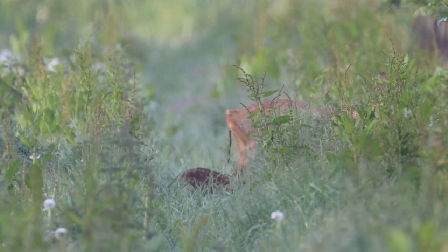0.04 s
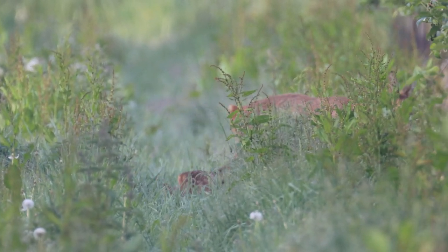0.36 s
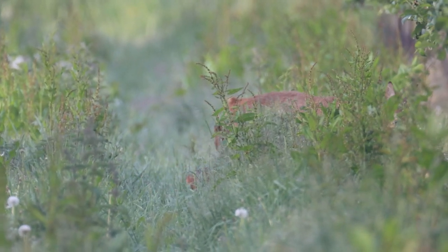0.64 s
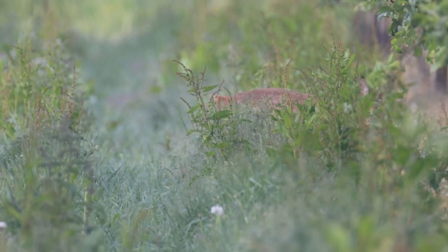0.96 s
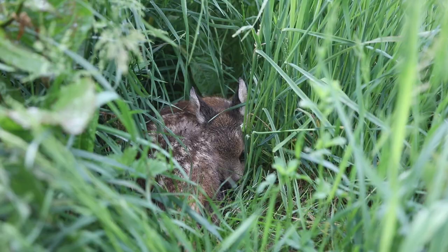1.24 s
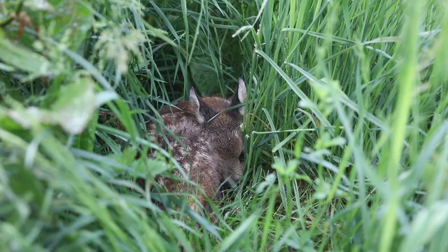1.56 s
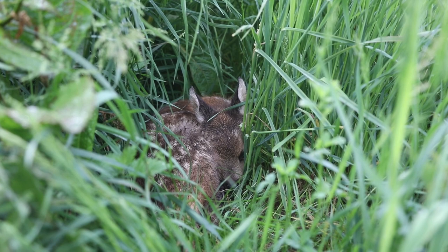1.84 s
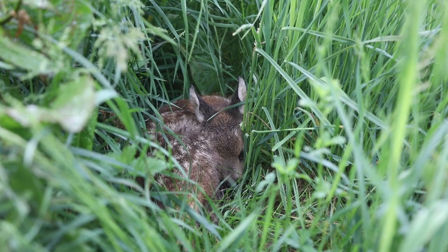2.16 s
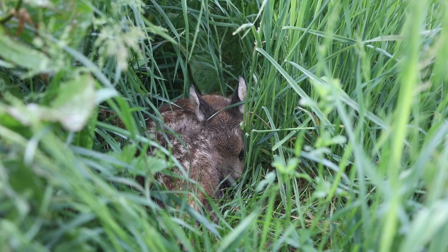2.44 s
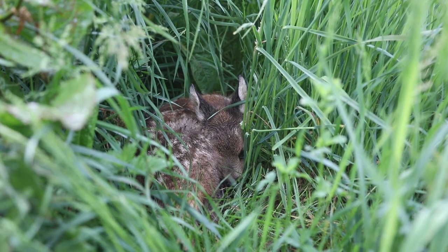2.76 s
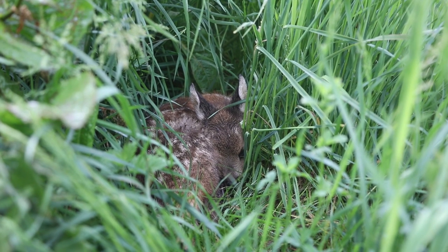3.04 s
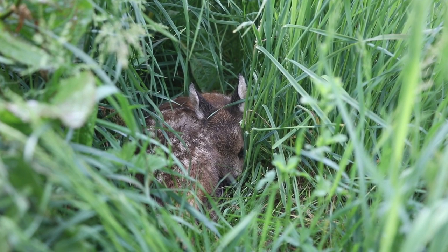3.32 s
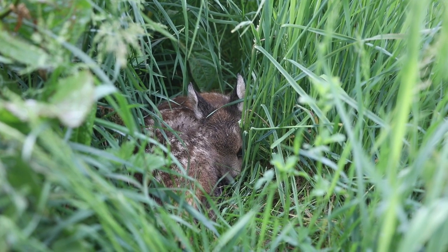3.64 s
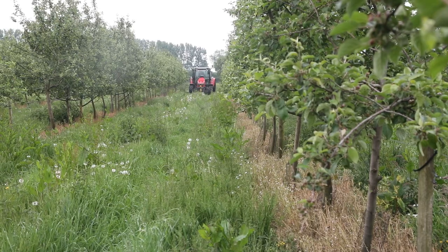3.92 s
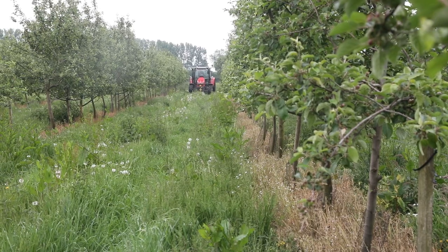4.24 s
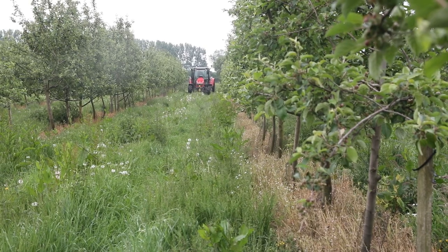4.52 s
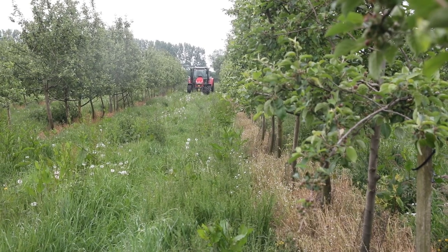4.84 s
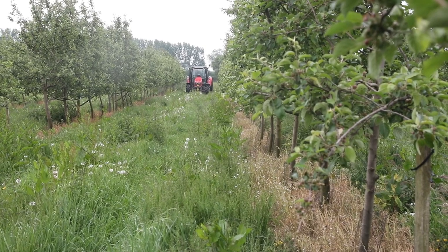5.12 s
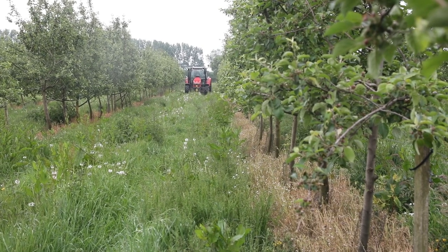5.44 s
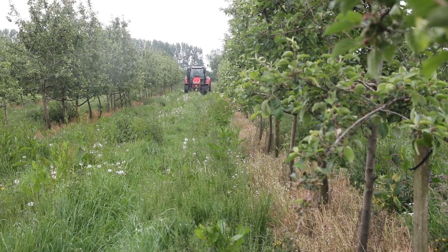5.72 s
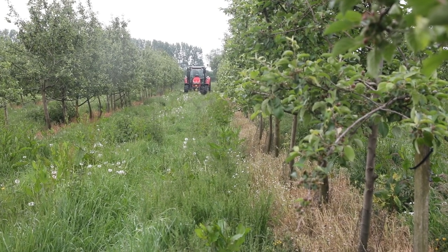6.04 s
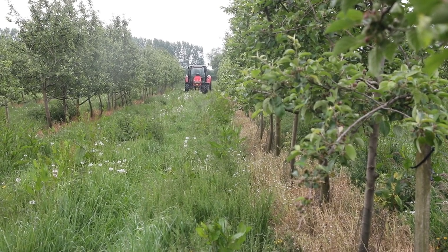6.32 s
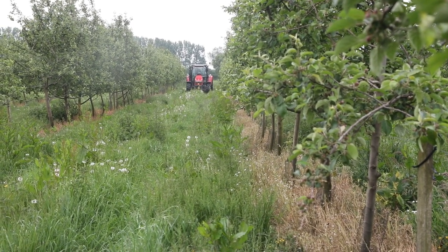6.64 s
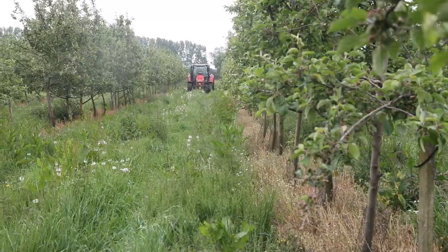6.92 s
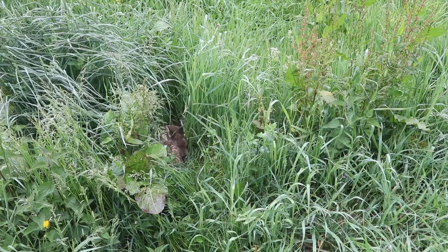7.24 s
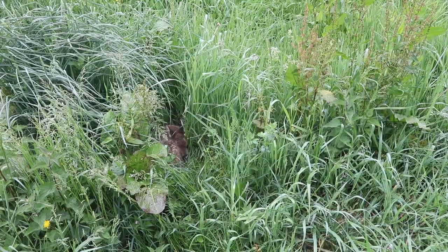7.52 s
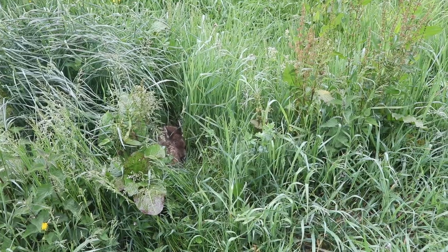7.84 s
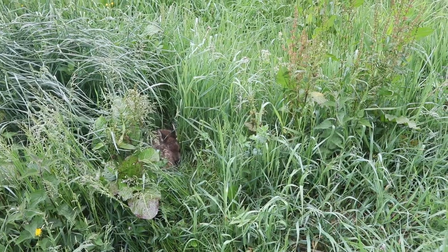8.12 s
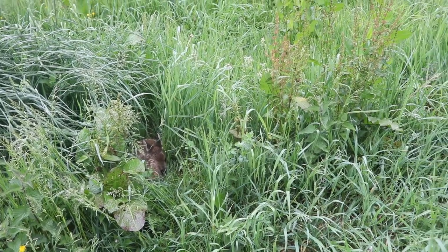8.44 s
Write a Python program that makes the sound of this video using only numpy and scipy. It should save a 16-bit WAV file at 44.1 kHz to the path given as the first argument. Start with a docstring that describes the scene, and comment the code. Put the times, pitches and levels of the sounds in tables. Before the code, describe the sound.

After a brief meadow hush, a diesel tractor drones far off, then closer and louder, with faint ticks and small bird chirps.

```python
"""Four spots in an orchard, joined by hard cuts. First a quiet meadow: still air, a camera's dry ticks,
a deer brushing through weeds. From 1.3 s a three-cylinder diesel tractor drones far off at steady revs:
firings ring the silencer, injectors and valves clatter. The camera adds hum, a thin whine and two motor
whistles; small birds chirp. From 3.9 s the tractor creeps closer down a lane, its gears singing.
At 7.3 s, after a soft bump, it is heard from the grass verge with heavier beats."""
import sys
import numpy as np
from scipy import signal
from scipy.fft import rfft, irfft
from scipy.io import wavfile
from scipy.ndimage import uniform_filter1d

SR = 44100
rng = np.random.default_rng(int(sys.argv[2]) if len(sys.argv) > 2 else 0)


def transcribe(u):
    """Save the signal u as a 16-bit wav file named by the first command-line argument.

    u: samples, shape (n,) or (channels, n), limited to [-1, 1]; the rate is SR.
    q: integer samples, one column per channel.
    """
    v = np.clip(np.atleast_2d(u).T, -1, 1)
    q = np.round(v * 32767).astype(np.int16)
    wavfile.write(sys.argv[1], SR, q)


N = 382347
TIME_S = np.arange(N) / SR
MEADOW, FAR, LANE, VERGE = range(4)

# Each entry: start of a spot in seconds; the last ends the verge.
SPOT_EDGES_S = [0, 1.322, 3.879, 7.283, 8.7]
# Each entry: time of a camera tick in seconds.
TICK_TIMES_S = [.267, .309, .724, .806, .871, .901, 1.145, 1.161, 1.297, 1.346, 1.369, 1.46, 1.506, 1.76,
                2.005, 2.03, 2.068, 2.081, 2.111, 2.144, 2.451, 2.575, 2.588, 2.874, 3.008, 3.099, 3.137,
                3.18, 3.255, 3.303, 3.312, 3.405, 3.472, 3.6, 3.633]

# Spectra of air, ticks and weeds. Each row: frequency in Hz, relative level in dB.
AIR_HZ_DB = [(18, -48), (30, -12), (107, -9.5), (139, -3.5), (167, -7.5), (260, -6.5), (288, -8.5),
             (581, -13.5), (1200, -18.5), (1560, -13.5), (1920, -19.5), (3590, -22), (5030, -26.5),
             (7240, -31), (15000, -35)]
TICK_MEADOW_HZ_DB = [(800, -14), (2000, -1.5), (4200, -0.5), (6000, -5), (8600, -9), (9500, -13),
                     (15000, -20)]
TICK_LATER_HZ_DB = [(1000, -12), (2800, -8.5), (3420, 4.5), (3950, 0.5), (4600, -19), (7500, -23),
                    (8800, -22), (9800, -11), (10300, -19), (10900, -15), (12500, -26)]
STEMS_HZ_DB = [(1250, -22), (1600, 0), (1950, 1), (2500, -4), (3500, -7), (4200, 0), (4700, -17)]
LEAVES_HZ_DB = [(2000, -7), (3050, 3), (4000, -5), (5100, -7), (5600, -11), (6300, -12), (7000, -16)]
ROUGHNESS_HZ_DB = [(10, -6), (150, 4), (400, -14)]

# Engine speed. Each row: time in seconds, firing rate in Hz.
FIRING_S_HZ = [(1.32, 41.5), (3.85, 41.9), (3.9, 42.75), (5.1, 42.4), (7.35, 42.35), (8.65, 42.65)]
# Cylinders. Each row: relative level in dB, lateness as a share of one firing.
CYLINDER_DB_LAG = [(3, -0.0052), (-1, 0.018), (4, -0.013)]
# Spectra of exhaust beat, gas rasp, far drone and ring. Each row: frequency in Hz, relative level in dB.
EXHAUST_HZ_DB = [(25, -39), (42, -27.5), (60, -11.5), (85, -3.5), (127, -0.8), (168, 1), (212, -12),
                 (255, -20), (340, -36.5), (600, -47.5)]
FAR_GAS_HZ_DB = [(480, -10), (620, -2), (740, -10.5)]
LANE_GAS_HZ_DB = [(330, -22), (420, 4), (560, -0.5), (620, -6.5), (720, -20)]
BLUR_HZ_DB = [(75, -12.5), (95, -12.5), (125, -4.5), (165, 1), (205, -1.5), (260, -12.5)]
RUMBLE_HZ_DB = [(30, -14), (42, 4), (60, -25), (85, 3), (110, -8)]
RING_HZ_DB = [(1150, -18.5), (1260, 3), (1340, 1), (1440, -23.5)]
# Clatter coloured by ground and trees, and hiss above it. Each row: frequency in Hz, relative level in dB.
FAR_CLATTER_HZ_DB = [(200, -0.5), (300, 4.5), (480, -5.5), (730, -9.5), (1000, -5), (1300, -3),
                     (1480, -9.5), (2000, -11.5), (3150, -15.5), (3300, -11), (3420, -8), (3600, -15),
                     (4700, -30), (7000, -37.5)]
LANE_CLATTER_HZ_DB = [(200, 0.5), (340, -12), (570, -6.5), (710, -10.5), (900, -7), (1120, 2), (1400, -1.5),
                      (1750, -5.5), (2000, -7), (3150, -11), (3420, -9.5), (3800, -17), (4800, -17.5),
                      (5600, -39)]
VERGE_CLATTER_HZ_DB = [(180, 2), (270, 3.5), (400, -6), (500, -10.5), (600, -9), (900, -9), (1200, -3),
                       (1420, -1), (1680, -9.5), (2000, -18.5), (2600, -17.5), (3100, -13), (4000, -20),
                       (5200, -34.5)]
FAR_HISS_HZ_DB = [(3000, 1), (5200, -7), (7400, 2.5), (8700, -2.5), (10000, 1.5), (12000, 0.5), (15000, -7)]
LANE_HISS_HZ_DB = [(3500, -11), (5500, -5), (7300, 1), (8600, -4), (10500, -3), (12000, -9), (14500, -24)]
VERGE_HISS_HZ_DB = [(3500, -5), (5200, -3.5), (6800, 1.5), (8000, -4.5), (10600, -1.5), (12500, -14.5),
                    (14000, -18), (15200, -22)]
# Far drone carried on moving air. Each row: time in seconds, gain in dB.
CARRY_S_DB = [(1.33, 3.5), (1.76, 3), (1.87, -3.5), (1.97, 3.5), (2.4, -4.5), (2.85, 0), (3.32, -4.5),
              (3.45, 4.5), (3.58, -1), (3.87, 2)]
# Gas rasp. Each row: time in seconds, level in dB.
FAR_GAS_S_DB = [(2.1, -80), (3.0, -57.5), (3.88, -58)]
LANE_GAS_S_DB = [(3.9, -54.5), (6.0, -46.5), (7.28, -48.5)]
# Gear tones. Each row: multiple of the firing rate, lane level and verge level in dB re the clatter.
GEAR_ORDER_DB = [(32, -14, -23), (100 / 3, -21, -10.5), (36, -19, -24), (40, -14, -22.5),
                 (160 / 3, -19.5, -30)]

# Camera motor hum. Each row: frequency in Hz, level in dB.
HUM_HZ_DB = [(100, -54), (150, -51), (200, -54.5), (250, -64), (300, -65.5), (350, -73)]
# Motor whistles. Each row: start, attack, hold and release in seconds.
WHISTLE_SHAPES_S = [(1.6, .15, .1, .2), (3.2, .08, .15, .22)]
# Each entry: level of one whistle in dB.
WHISTLE_LEVELS_DB = [-62, -63]
# Chirps. Each row: start and length in seconds, start, middle and end pitch in Hz, pre-echo level in dB.
CHIRP_S_HZ_DB = [(1.74, 0.06, 7500, 6950, 6800, -69), (2.45, 0.11, 4260, 4450, 4430, -76),
                 (5.137, 0.028, 5950, 5400, 5100, -57), (5.168, 0.059, 5130, 5000, 5100, -52),
                 (5.395, 0.054, 3700, 4090, 4100, -46.5), (7.332, .075, 5200, 4975, 5200, -51.5),
                 (7.562, 0.049, 3850, 4110, 4050, -50.5), (7.781, 0.054, 3900, 4100, 4000, -51)]


def undb(db):
    """Decibels to gain."""
    return np.exp(np.asarray(db) * np.log(10) / 20)


def unit(x):
    """Scale to rms 1."""
    return x / np.sqrt(np.mean(x ** 2))


def noise():
    """White noise."""
    return rng.standard_normal(N)


def curve(table):
    """Straight lines through (seconds, value) rows."""
    return np.interp(TIME_S, *np.transpose(table))


def walk(rate_hz):
    """Smooth random drift, rms 1."""
    points = rng.standard_normal(2048)
    drift = np.interp(TIME_S * rate_hz, np.arange(len(points)), points)
    return unit(uniform_filter1d(drift, max(int(SR / rate_hz), 1)))


def response(hz_db, size=8192):
    """Minimum-phase impulse response of a spectrum; 24 dB per octave roll-off past its ends."""
    hz, db = np.transpose(hz_db)
    octave = np.log2(np.maximum(np.arange(size // 2 + 1) * SR / size, 1))
    outside = np.abs(octave - np.clip(octave, np.log2(hz[0]), np.log2(hz[-1])))
    gain_db = np.maximum(np.interp(octave, np.log2(hz), db) - 24 * outside, -80)
    cepstrum = irfft(np.log(undb(gain_db)))
    cepstrum[1:size // 2] *= 2
    cepstrum[size // 2 + 1:] = 0
    return irfft(np.exp(rfft(cepstrum)))


def colour(x, hz_db):
    """Filter by a spectrum; rms 1."""
    return unit(signal.fftconvolve(x, response(hz_db))[:N])


def add(out, start_s, sound):
    """Mix in a short sound."""
    i = max(int(start_s * SR), 0)
    out[i:i + len(sound)] += sound[:max(N - i, 0)]


def spot(index):
    """1 during this spot, else 0."""
    return (TIME_S >= SPOT_EDGES_S[index]) & (TIME_S < SPOT_EDGES_S[index + 1])


def swell(start_s, attack_s, hold_s, release_s, db):
    """Trapezoid gain that holds at db."""
    corners_s = start_s + np.cumsum([0, attack_s, hold_s, release_s])
    return undb(db) * np.interp(TIME_S, corners_s, [0, 1, 1, 0])


def tone(cycles, waver_rad, flutter_db):
    """Sine with wavering phase and level; rms 1."""
    return unit(np.sin(2 * np.pi * cycles + waver_rad * walk(25)) * undb(flutter_db * walk(9)))


def meadow_air():
    """Still air: faint, nearly steady noise."""
    return undb(-60 + .25 * walk(4.8)) * colour(noise(), AIR_HZ_DB)


def camera_ticks():
    """A part of the mechanism strikes, then settles with a second touch 5 ms later."""
    out = np.zeros(N)
    t = np.arange(SR // 50) / SR
    touches = np.exp(-t / .0028) + .35 * (t > .005) * np.exp(-np.abs(t - .005) / .0018)
    for start_s in TICK_TIMES_S:
        in_meadow = start_s < SPOT_EDGES_S[FAR]
        peak_db, ring = (-46.2, TICK_MEADOW_HZ_DB) if in_meadow else (-43, TICK_LATER_HZ_DB)
        tick = signal.fftconvolve(touches * rng.standard_normal(len(t)), response(ring))
        add(out, start_s, undb(peak_db + .5 * rng.standard_normal()) * tick / np.abs(tick).max())
    return out


def deer(scrape_start_s=.51, sag_hz_per_s=3800):
    """Leaves and stems brush the deer's flank; a rough scrape sinks in pitch as a stalk bends."""
    stems = colour(noise() * undb(2 * walk(149.2)), STEMS_HZ_DB)
    leaves = colour(noise() * undb(2 * walk(120)), LEAVES_HZ_DB)
    roughness = colour(noise(), ROUGHNESS_HZ_DB)
    scrape_hz = 3520 - sag_hz_per_s * np.clip(TIME_S - scrape_start_s, 0, .5)
    scrape = unit(roughness * np.sin(2 * np.pi * np.cumsum(scrape_hz) / SR))
    return (leaves * swell(.44, .14, .17, .13, db=-63)
            + scrape * swell(scrape_start_s, .07, .08, .09, db=-65.5)
            + stems * swell(.675, .05, .08, .07, db=-55.5))


def exhaust(firings, spread_db, jitter_s):
    """One pulse per firing rings the silencer; each cylinder has its own strength and lag."""
    number = np.arange(1, int(firings[-1]))
    db, lag = np.array(CYLINDER_DB_LAG)[number % len(CYLINDER_DB_LAG)].T
    chance = rng.standard_normal((len(number), 2))
    times_s = np.interp(number + lag, firings, TIME_S) + jitter_s * chance[:, 0]
    pulses = np.zeros(N)
    pulses[np.clip((times_s * SR).astype(int), 0, N - 1)] = undb(db + spread_db * chance[:, 1])
    return colour(-pulses, EXHAUST_HZ_DB)


def tree_echo(x, t60_s, wet_db):
    """Rows of trees smear the sound; moving air shifts the weight between two sets of paths. Rms 1."""
    t = np.arange(SR // 2) / SR
    decay = undb(-60 * t / t60_s)
    paths = [unit(signal.fftconvolve(x, rng.standard_normal(len(t)) * decay)[:N]) for _ in range(2)]
    mix_rad = walk(3)
    return unit(x + undb(wet_db) * (np.cos(mix_rad) * paths[0] + np.sin(mix_rad) * paths[1]))


def clatter(firings, hz_db, repeat_share, throb_db, flicker_db):
    """Injectors and valves knock alike each engine cycle, amid loose rattle; both throb per firing."""
    cycle = firings / len(CYLINDER_DB_LAG) % 1
    pattern = rng.standard_normal(3072)
    repeating = pattern[(cycle * len(pattern)).astype(int) % len(pattern)]
    knocks = rng.standard_normal(36)
    knock_db = np.interp(cycle, np.arange(len(knocks)) / len(knocks), knocks, period=1)
    gain_db = throb_db * np.cos(2 * np.pi * (firings - .2)) + knock_db + flicker_db * walk(14)
    rattle = np.sqrt(repeat_share) * repeating + np.sqrt(1 - repeat_share) * noise()
    return colour(rattle * undb(gain_db), hz_db)


def hiss(firings, hz_db, throb_db, grain_db):
    """Grainy hiss that pulses slightly with the engine."""
    gain_db = throb_db * np.cos(2 * np.pi * firings) + grain_db * walk(200)
    return colour(noise() * undb(gain_db), hz_db)


def tractor_far(firings):
    """Behind many trees the beats blur into a drone that comes and goes, under a metallic ring."""
    beats = tree_echo(exhaust(firings, spread_db=3, jitter_s=.00071), t60_s=.54, wet_db=1.5)
    blur = undb(-49.5) * colour(noise(), BLUR_HZ_DB)
    rumble = undb(-55) * colour(noise(), RUMBLE_HZ_DB)
    carry = undb(curve(CARRY_S_DB) + 1.5 * walk(11))
    drone = carry * (undb(-47) * beats + blur + rumble)
    rattle = clatter(firings, FAR_CLATTER_HZ_DB, repeat_share=.35, throb_db=.8, flicker_db=.27)
    gas = undb(curve(FAR_GAS_S_DB)) * colour(noise(), FAR_GAS_HZ_DB)
    ring = undb(-57) * colour(noise(), RING_HZ_DB)
    treble = undb(-69) * hiss(firings, FAR_HISS_HZ_DB, throb_db=.5, grain_db=.5)
    return drone + undb(-50.5) * rattle + gas + ring + treble


def camera_hum():
    """The motor hums in wavering harmonics from the second spot on."""
    hum = sum(undb(db) * tone(hz * TIME_S, waver_rad=.71, flutter_db=4) for hz, db in HUM_HZ_DB)
    return hum * (TIME_S >= SPOT_EDGES_S[FAR])


def camera_whine(hz=15655):
    """Thin electronic tone, at its own level in each tractor spot."""
    gain = undb(-65.5) * spot(FAR) + undb(-60.5) * spot(LANE) + undb(-69) * spot(VERGE)
    return gain * np.sqrt(2) * np.sin(2 * np.pi * hz * TIME_S)


def camera_whistles(hz=2260):
    """The motor whistles briefly, twice."""
    gain = sum(swell(*shape, db=db) for shape, db in zip(WHISTLE_SHAPES_S, WHISTLE_LEVELS_DB))
    return gain * tone(hz * TIME_S, waver_rad=2.1, flutter_db=6)


def birds():
    """Short whistled slurs with a light echo from the trees."""
    out = np.zeros(N)
    for start_s, length_s, start_hz, middle_hz, end_hz, db in CHIRP_S_HZ_DB:
        progress = np.linspace(0, 1, int(length_s * SR))
        hz = np.polyval(np.polyfit([0, .5, 1], [start_hz, middle_hz, end_hz], 2), progress)
        envelope = np.sqrt(2 * np.abs(np.sin(np.pi * progress)))
        add(out, start_s, undb(db) * envelope * np.sin(2 * np.pi * np.cumsum(hz) / SR))
    return np.std(out) * tree_echo(unit(out), t60_s=.23, wet_db=-5)


def gears(firings, level_column):
    """Gear teeth sing at set multiples of the engine speed."""
    return sum(undb(row[level_column]) * tone(row[0] * firings, waver_rad=1, flutter_db=1.5)
               for row in GEAR_ORDER_DB)


def approach(index, engine, treble, engine_db_per_s=.89, treble_db_per_s=1.82):
    """The tractor creeps closer: levels grow from the start of the spot, the treble fastest."""
    elapsed_s = TIME_S - SPOT_EDGES_S[index]
    return engine * undb(engine_db_per_s * elapsed_s) + treble * undb(treble_db_per_s * elapsed_s)


def tractor_lane(firings):
    """Straight down the lane: distinct beats, a puff of gas with each, bright clatter."""
    beats = tree_echo(exhaust(firings, spread_db=.9, jitter_s=.00012), t60_s=.3, wet_db=-17)
    gas = clatter(firings, LANE_GAS_HZ_DB, repeat_share=.49, throb_db=3, flicker_db=-.5)
    rattle = clatter(firings, LANE_CLATTER_HZ_DB, repeat_share=.34, throb_db=.37, flicker_db=.5)
    engine = undb(-34) * beats + undb(-40.5) * (rattle + gears(firings, level_column=1))
    treble = undb(-56.3) * hiss(firings, LANE_HISS_HZ_DB, throb_db=.1, grain_db=.68)
    return undb(curve(LANE_GAS_S_DB)) * gas + approach(LANE, engine, treble)


def bump(width_s=.003):
    """One soft, low pulse as the verge spot begins."""
    return -undb(-28) * np.exp(-((TIME_S - SPOT_EDGES_S[VERGE]) / width_s) ** 2)


def tractor_verge(firings):
    """From the tall grass at the side: heavier beats, a nasal ring, a duller tone."""
    beats = tree_echo(exhaust(firings, spread_db=.9, jitter_s=.00012), t60_s=.3, wet_db=-15)
    rattle = clatter(firings, VERGE_CLATTER_HZ_DB, repeat_share=.29, throb_db=.5, flicker_db=.36)
    engine = undb(-30) * beats + undb(-37) * (rattle + gears(firings, level_column=2))
    treble = undb(-55) * hiss(firings, VERGE_HISS_HZ_DB, throb_db=-.5, grain_db=.7)
    return approach(VERGE, engine, treble)


def scene():
    """The four spots in turn, with camera, birds and bump over them; mono."""
    # running count of firings; the crankshaft turns slightly unevenly
    firings = np.cumsum(curve(FIRING_S_HZ)) / SR + .38 + .007 * walk(20)
    spots = [meadow_air() + deer(), tractor_far(firings), tractor_lane(firings), tractor_verge(firings)]
    orchard = sum(sound * spot(index) for index, sound in enumerate(spots))
    camera = camera_hum() + camera_whine() + camera_whistles() + camera_ticks()
    return (orchard + camera + birds() + bump())[None]


def record(dry, cutoff_hz=15750):
    """Steep elliptic low-pass."""
    return signal.sosfilt(signal.ellip(12, .1, 80, cutoff_hz, fs=SR, output="sos"), dry)


dry = scene()
out = record(dry)
transcribe(out)
```